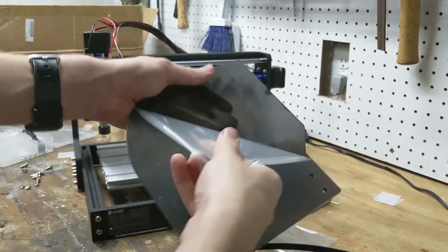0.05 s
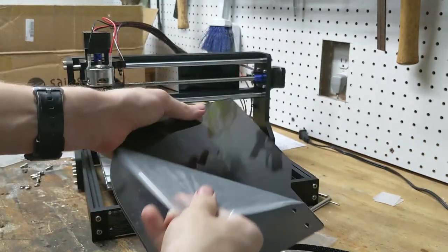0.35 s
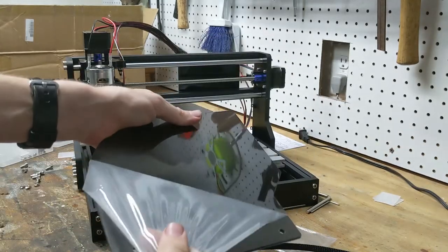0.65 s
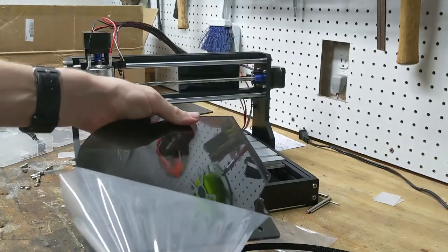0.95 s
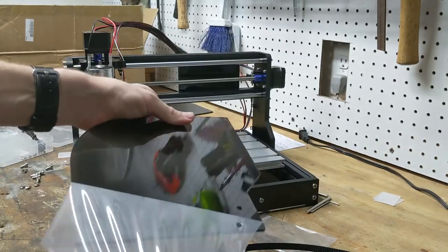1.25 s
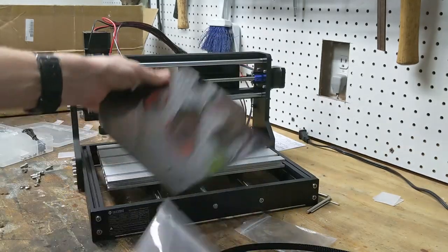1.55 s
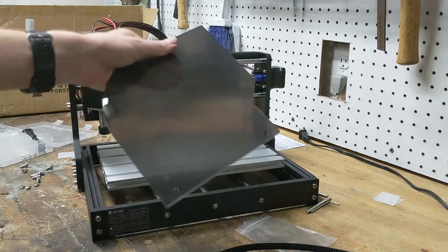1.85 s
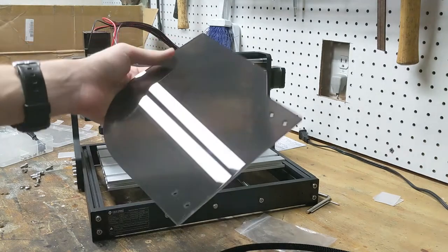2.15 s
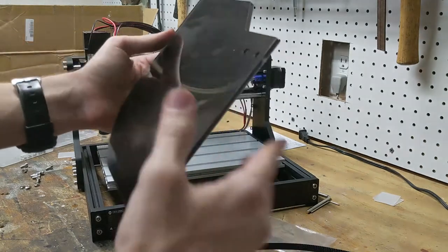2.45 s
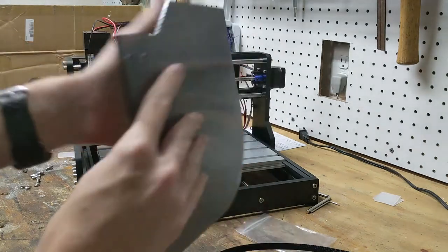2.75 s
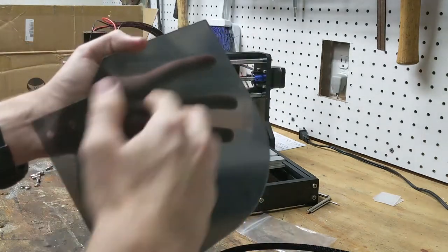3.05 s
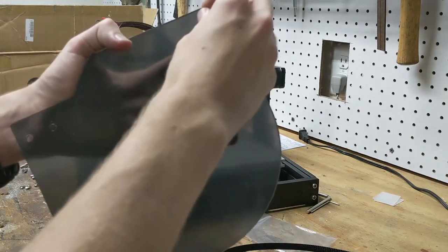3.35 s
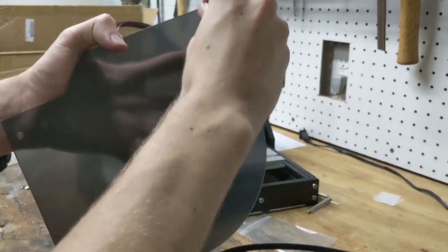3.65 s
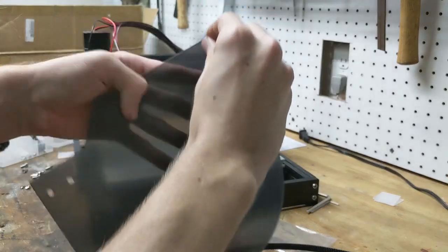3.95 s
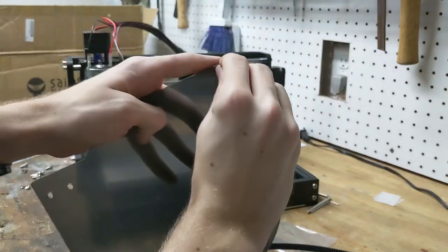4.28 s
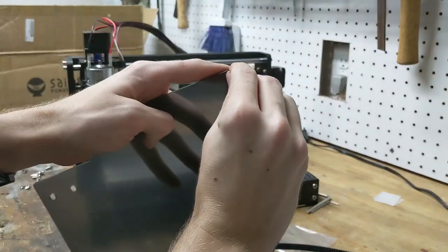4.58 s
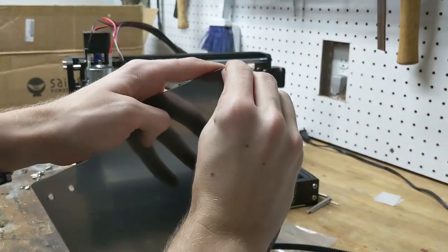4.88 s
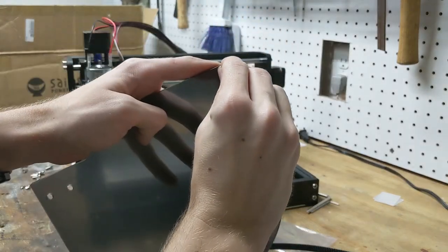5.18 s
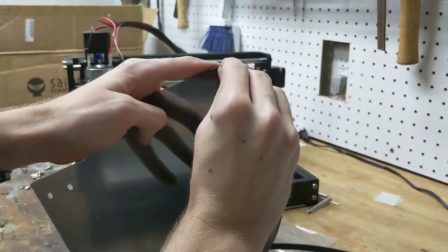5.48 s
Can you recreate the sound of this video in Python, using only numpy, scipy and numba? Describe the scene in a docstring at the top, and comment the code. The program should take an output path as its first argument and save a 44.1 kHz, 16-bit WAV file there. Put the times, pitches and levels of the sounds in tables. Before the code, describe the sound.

Sharp snaps and a fizzing crackle sound close to a stereo microphone as plastic film is pulled off a hand-held acrylic sheet. The film flutters, rips free and crinkles briefly. Quieter handling follows, with rubbing fingers, light ticks and faint squeaks, until the sheet lands with a low knock and a few smaller bumps. A faint workshop hum runs underneath, and the room echoes only slightly.

```python
"""A small workshop with a low hum, a stereo microphone close to a hand-held acrylic panel.
Protective film is pulled off in a few pulls: the glue lets go in countless tiny snaps that drum
on the taut film, and the loose film flutters, flaps and crinkles. Then the panel is turned over,
fingers slide and squeak on it, and it is set down with a knock. Bench and walls answer briefly."""
import sys
import numpy as np
from scipy import signal
from scipy.fft import rfft, irfft
from scipy.io import wavfile
from scipy.ndimage import uniform_filter1d
from numba import njit

SR = 44100
rng = np.random.default_rng(int(sys.argv[2]) if len(sys.argv) > 2 else 0)


def store_wav(level_fs):
    """Save 16-bit WAV to argv[1]."""
    pcm = np.round(np.clip(np.atleast_2d(level_fs), -1, 1) * 32767)
    wavfile.write(sys.argv[1], SR, pcm.T.astype(np.int16))


N = 247842
T = np.arange(N) / SR


def undb(db):
    """Decibels to gain."""
    return 10 ** (np.asarray(db) / 20)


def unit(x):
    """Scale to rms 1."""
    return x / np.sqrt(np.mean(x ** 2))


def colour(x, points):
    """Causal filter with a spectrum of (f/Hz, level/dB) points."""
    size = 4096
    hz, db = np.transpose(points)
    f = np.fft.rfftfreq(size, 1 / SR) + 1
    cepstrum = irfft(np.log(undb(np.interp(np.log(f), np.log(hz), db))))
    cepstrum[1:size // 2] *= 2  # folded for minimum phase
    cepstrum[size // 2 + 1:] = 0
    response = irfft(np.exp(rfft(cepstrum))).reshape((1,) * (x.ndim - 1) + (-1,))
    return signal.fftconvolve(x, response, axes=-1)[..., :x.shape[-1]]


def cut(x, hz, kind, order=2):
    """Low-, high- or band-pass."""
    sos = signal.butter(order, np.minimum(hz, SR / 2 - 1), kind, fs=SR, output="sos")
    return signal.sosfilt(sos, x)


def add(out, s, x):
    """Mix a sound in at time s."""
    i = max(int(s * SR), 0)
    out[..., i:i + x.shape[-1]] += x[..., :max(N - i, 0)]


@njit
def resonate(x, hz, damping):
    """Band-pass whose centre moves."""
    y, band, low = np.empty(len(x)), 0., 0.
    for i in range(len(x)):
        g = np.tan(np.pi * hz[i] / SR)
        v = (band + g * (x[i] - low)) / (1 + g * (g + damping))
        band, low = 2 * v - band, low + 2 * g * v
        y[i] = damping * v
    return y


def echo(x, lag):
    """A copy that comes a moving number of samples later."""
    samples = np.arange(len(x))
    return np.interp(samples - lag, samples, x)


def fade(t, t60):
    """Exponential decay."""
    return np.exp(-np.log(1000) * t / t60)


def walk(rate):
    """Smooth random drift with rms 1."""
    hold = int(SR / rate)
    steps = np.repeat(rng.standard_normal(N // hold + 1), hold)
    return unit(uniform_filter1d(uniform_filter1d(steps, hold), hold)[:N])


def grains(rate, spread_db):
    """Tiny slips at random moments; the spread makes a few much larger than the rest."""
    size = undb(spread_db * np.minimum(rng.exponential(size=N), 4))
    return unit((rng.random(N) < rate / SR) * size * rng.choice([-1, 1], N))


def burst(t60):
    """A dying spray of noise, unlike at the microphone's two ports."""
    t = T[:SR // 5]
    return rng.standard_normal((2, len(t))) * fade(t, t60)


def ring(modes):
    """Response of a set of modes to one blow, peak 1."""
    t = T[:SR // 2]
    y = sum(undb(db) * np.sin(2 * np.pi * hz * t) * fade(t, t60) for hz, db, t60 in modes)
    y *= 1 - fade(t, t60=0.0084)  # the bend takes a moment to spread over the sheet
    return y / np.abs(y).max()


# reverberation of the workshop walls: f/Hz, t60/s
WALL_DECAY = [(100, 0.37), (500, 0.27), (2000, 0.4), (6000, 0.29), (15000, 0.2)]
def room(x, near_db, far_db, near_t60):
    """Direct sound, quick echoes from bench and pegboard, then the tail from farther off."""
    t = T[:SR // 2]
    hz, t60 = np.transpose(WALL_DECAY)
    edges = np.geomspace(60, 20000, 9)
    mid, side = rng.standard_normal((2, len(t)))
    side = cut(side, 700, "high", order=1)  # the bass is alike at both ports
    noise = np.array([mid + side, mid - side]) / np.sqrt(2)
    tail = sum(cut(noise, [low, high], "band") * fade(t, np.interp(np.sqrt(low * high), hz, t60))
               for low, high in zip(edges, edges[1:]))
    near = undb(near_db) * unit(noise[:, ::-1] * fade(t, near_t60) * (t > .002))
    far = undb(far_db) * unit(tail * (t > .008))
    response = (near + far) / np.sqrt(len(t))
    return x + signal.fftconvolve(np.atleast_2d(x), response, axes=-1)[:, :N]


# room tone all around the microphone: f/Hz, relative level/dB
ROOM_TONE = [(20, -3.5), (62, 1), (86, -20.5), (120, -8), (170, -22.5), (250, -16.5), (450, -19),
             (760, -22), (1400, -32.5), (2400, -32.5), (3500, -30.5), (9000, -35.5), (16000, -39.5)]
# low hum of the workshop: f/Hz, level/dB
HUM_TONES = [(118.4, -77), (236.9, -76), (301.5, -80), (376.8, -89.5)]
def workshop(air_db=-62):
    """Steady rumble and hiss with a wavering hum."""
    mid, side = rng.standard_normal((2, N))
    side = 0.13 * side + cut(side, 553, "high", order=1)
    air = unit(colour(np.array([mid + side, mid - side]), ROOM_TONE))
    hum = np.zeros(N)
    for hz, db in HUM_TONES:
        peak = np.sqrt(2) * undb(db + 1.3 * walk(rate=5.1))
        hum += peak * np.sin(2 * np.pi * hz * T + 0.32 * walk(rate=5))
    return air * undb(air_db + 0.77 * walk(rate=4.27)) + hum


# fingers and loose film sliding on the panel: t/s, length/s, level/dB
SLIDES = [(0.0, 0.022, -56.5), (0.29, 0.13, -70), (1.74, 0.26, -55.5), (1.945, 0.21, -54),
          (2.132, 0.2, -56.5), (2.3, 0.35, -70.5), (2.56, 0.33, -64.5), (2.828, 0.32, -68),
          (3.087, 0.14, -63.5), (3.438, 0.028, -49), (3.2, 1.2, -75.5), (3.812, 0.22, -64.5),
          (4.069, 0.051, -65), (4.187, 0.088, -60), (4.32, 0.13, -67)]
# spectrum of the sliding: f/Hz, relative level/dB
SLIDE_SPECTRUM = [(300, 3), (1000, -2), (2000, -8), (3500, -0.5), (8000, -0.5), (12000, -2.5),
                  (16000, -0.5)]
def rubs():
    """Skin and loose film stick and slip over the panel in short swells."""
    swell = np.zeros(N)
    for s, length, db in SLIDES:
        add(swell, s, undb(db) * np.sqrt(np.hanning(int(length * SR))))
    slips = np.array([grains(rate=2500, spread_db=0) for _ in range(2)])
    friction = unit(colour(slips, SLIDE_SPECTRUM))
    return room(friction * swell, near_db=-4.5, far_db=-5.5, near_t60=0.037)


# pulls on the film, close by: start t/s, end t/s, swell of the fizz/(dB/s), fizz level/dB,
# drum level/dB, flutter level/dB, drum start f/Hz, end f/Hz, flutter start f/Hz, end f/Hz
FILM_PULLS = [(0.021, 0.166, 46.5, -53.5, -54.5, -68.5, 2000, 2240, 324, 440),
              (0.167, 0.306, -49, -56, -59.5, -63.5, 750, 800, 490, 586),
              (0.38, 0.674, -15.5, -49, -65.5, -62, 830, 740, 382, 112),
              (0.782, 0.991, -25, -52.5, -64.5, -65.5, 720, 630, 447, 325),
              (1.129, 1.457, -8.5, -53.5, -60, -62, 780, 770, 455, 220),
              (1.439, 1.554, 120, -53.5, -50, -61, 865, 1020, 210, 240),
              (1.547, 1.671, 5, -40.5, -40, -59, 1380, 2000, 270, 250)]
# spectrum of the parting glue: f/Hz, relative level/dB
GLUE_SPECTRUM = [(250, -33), (700, -18), (1500, -17), (2800, -4.5), (4400, -1.5), (5700, -1), (7600, -2.5),
                 (11000, -5.5), (16000, -4.5)]
def peel():
    """The glue line lets go in a dense fizz, and the same tugs drum on the film."""
    _, _, _, fizz_db, drum_db, _, start_hz, end_hz, _, _ = np.transpose(FILM_PULLS)
    grip = undb(1.04 * walk(rate=97))  # the glue holds unevenly
    # the line is long, so each port hears its own share of the snaps
    snaps = np.array([grains(rate=7000, spread_db=4.5) for _ in range(2)])
    # the panel mirrors them over a path that changes as the hands move
    mirrored = np.array([echo(port, SR * 0.000697 * undb(2 * walk(rate=14))) for port in snaps])
    fizz = unit(colour(snaps + .5 * mirrored, GLUE_SPECTRUM))
    fizz *= pull_gain(fizz_db, speed_share=1, release_t60=0.24)  # glue creeps on after the hand stops
    hz = pull_glide(start_hz, end_hz)
    drum = resonate(grains(rate=1400, spread_db=2.5), hz, damping=0.68) / np.sqrt(hz)
    drum = unit(cut(drum, 3800, "low")) * pull_gain(drum_db, speed_share=0.39)
    return room((fizz + drum) * grip, near_db=0.5, far_db=-14.5, near_t60=0.035)


# patches of glue giving way at once: t/s, half width/s, lift of the fizz/dB
GLUE_SURGES = [(0.098, 0.0077, 21.5), (0.135, 0.0078, 14), (0.157, 0.008, 11), (0.466, 0.038, 10.5),
               (0.812, 0.027, 3), (1.277, 0.035, 8.5), (1.535, 0.02, 5.5), (1.666, 0.016, 5.5)]
def pull_gain(levels_db, speed_share, release_t60=0.12, attack_s=0.026):
    """Each pull takes hold and dies away; a layer follows its share of the swell and the surges."""
    surge_db = sum(db * np.exp(-((T - s) / width) ** 2) for s, width, db in GLUE_SURGES)
    power = 0
    for (start, end, swell, *_), db in zip(FILM_PULLS, levels_db):
        attack = np.clip((T - start) / attack_s, 0, 1)
        release = fade(np.maximum(T - end, 0), release_t60)
        speed_db = swell * np.clip(T - start, 0, end - start) + surge_db
        power += (attack * release * undb(db + speed_share * speed_db)) ** 2
    return np.sqrt(power)


def pull_glide(start_hz, end_hz):
    """A resonance slides evenly in pitch through each pull as the span of film changes."""
    times = np.maximum.accumulate(np.array(FILM_PULLS)[:, :2].ravel())
    hz = np.column_stack([start_hz, end_hz]).ravel()
    return np.exp(np.interp(T, times, np.log(hz)))


def flutter():
    """The freed span of film shivers at its lowest resonance while it is pulled."""
    *_, flutter_db, _, _, start_hz, end_hz = np.transpose(FILM_PULLS)
    hz = pull_glide(start_hz, end_hz)
    span = resonate(rng.standard_normal(N), hz, damping=0.3)
    span = resonate(span, hz, damping=0.86) / np.sqrt(hz)
    heave = cut(rng.standard_normal(N), [90, 240], "band")  # the pull also shakes the whole panel
    shiver = (unit(span) + undb(-5) * unit(heave)) * pull_gain(flutter_db, speed_share=0.12)
    return room(shiver, near_db=-6.5, far_db=-8.5, near_t60=0.022)


def pop(hz):
    """A patch of film snaps through in a cycle or two; being small, it radiates little bass."""
    cycles = T[:SR // 20] * hz
    snap = np.sin(2 * np.pi * cycles) * (1 - np.exp(-2 * cycles)) * fade(cycles, t60=5.5)
    return cut(snap, hz / 2, "high")


# the larger creases: t/s, pop level/dB, pop f/Hz, crack level/dB, rattle level/dB
BUCKLES = [(0.029, -40, 2250, -29, -44.5), (0.055, -22, 1910, -42, -56), (0.066, -23, 2120, -13, -35),
           (0.080, -20, 2280, -18.5, -55), (0.0922, -9, 2270, -19, -35), (0.118, -17, 2230, -28, -29.5),
           (0.641, -35, 1060, -44, -53), (0.764, -60, 1020, -41.5, -54.5), (1.286, -29.5, 810, -38, -51),
           (1.455, -20, 950, -15.5, -34), (1.5652, -22, 1390, -12, -38), (1.666, -32, 2760, -17.5, -40),
           (1.738, -31, 1700, -38, -38), (1.811, -18, 1420, -30, -55), (1.824, -25, 1020, -23, -33),
           (1.876, -32, 1410, -34, -64), (1.891, -29, 1200, -32, -38), (1.921, -30, 1030, -48, -48),
           (1.944, -34, 1490, -34, -44.5), (2.008, -26, 1040, -34, -35.5), (2.055, -26, 2750, -16, -29.5),
           (2.109, -29.5, 1120, -50, -59), (2.194, -25.5, 1560, -33, -42.5), (2.231, -19, 1300, -19.5, -30),
           (2.310, -39, 1260, -31.5, -46.5)]
# colour of the film's cracks and the panel's ticks: f/Hz, relative level/dB
CRACK_SPECTRUM = [(300, -3.5), (600, -1), (1300, -5.5), (2600, -3.5), (5500, -1), (9000, -6), (12000, -3),
                  (16000, -12)]
def creases(relax_s=(1.78, 2.3), small_per_s=26, small_db=-40, small_hz=1300):
    """A crease buckles: a pop, a bright crack, and a rattle that dies away in the film."""
    pops, cracks = np.zeros(N), np.zeros((2, N))
    for s, pop_db, hz, crack_db, rattle_db in BUCKLES:
        crack = undb(crack_db) * burst(t60=0.0037) + undb(rattle_db) * burst(t60=0.13)
        add(pops, s + 0.00061, undb(pop_db) * pop(hz))
        add(cracks, s + .0008, cut(crack, hz * .4, "high"))
    # small creases only pop, at random, while the loose film relaxes
    first, last = relax_s
    for when, size, pitch in rng.random((int(small_per_s * (last - first)), 3)):
        small_pop = undb(small_db) * (.5 + size) * pop(small_hz * 2 ** (pitch - .5))
        add(pops, first + when * (last - first), small_pop)
    return room(pops + colour(cracks, CRACK_SPECTRUM), near_db=-6.5, far_db=-9, near_t60=0.048)


# lift of the film's highest treble: t/s, relative level/dB
TREBLE_LIFT = [(0.5, 2.5), (0.85, 8.5), (1.46, 5), (1.55, -2), (1.85, -7), (2.25, -8)]
def film_sheen(sound):
    """The film's highest treble is brighter in the gentle pulls, duller in the final rip and crinkling."""
    treble = sound - uniform_filter1d(sound, size=3, axis=-1)
    lift = undb(np.interp(T, *np.transpose(TREBLE_LIFT)))
    return sound + treble * (lift - 1)


# flaps of the slack film: t/s, level/dB
FILM_FLAPS = [(0.1484, -22.5), (0.151, -21.5), (0.158, -30), (0.243, -42.5), (0.277, -39.5), (0.381, -41.5)]
# modes of the film: f/Hz, relative level/dB, t60/s
FILM_MODES = [(137, -15, .08), (315, -17, 0.135), (398, -5.5, 0.086), (506, 11, 0.033), (816, 4, 0.037),
              (903, 6.5, 0.034), (1015, 2.5, 0.04), (1323, 4, 0.028), (1750, -28, .03)]
def flaps():
    """The freed film goes slack and is jerked tight again like a loose drumhead."""
    out = np.zeros(N)
    for s, db in FILM_FLAPS:
        add(out, s, undb(db) * ring(FILM_MODES))
    return room(out, near_db=-5, far_db=-9.5, near_t60=0.041)


# blows on the panel: t/s, level/dB, low-pass f/Hz, tick level/dB, share of ring time the grip leaves
PANEL_BLOWS = [(0.65, -39.5, 89, -67, 0.58), (2.667, -41, 160, -49, 0.57), (2.956, -50.5, 302, -66, 0.66),
               (3.057, -48, 200, -59, 0.32), (3.335, -38.5, 1110, -45, 0.37),
               (3.439, -66, 1500, -48.5, 0.35), (4.278, -19, 680, -51.5, 0.98),
               (4.323, -31, 300, -40, 0.82), (4.359, -38, 400, -64, 0.93), (4.416, -46, 895, -53.5, 0.77),
               (5.316, -49, 2500, -55, 1)]
# modes of the free panel: f/Hz, relative level/dB, t60/s
PANEL_MODES = [(116.4, -8.5, 0.31), (155, -3, 0.1), (227, -11.5, 0.27), (260.7, 3.5, 0.13),
               (299, -7.5, 0.13), (382, -1, 0.068), (444, -13, 0.16), (552, -10, 0.1), (630, -30, 0.067),
               (853, -9, 0.078), (1040, -8, 0.028), (1310, -10.5, 0.028), (1460, -19, 0.027),
               (2580, -16, 0.043)]
def knocks(buzz_db=-33.5):
    """The held panel rings low and briefly; soft contacts dull its high modes, hard edges add a tick."""
    out, ticks = np.zeros(N), np.zeros((2, N))
    for s, db, edge_hz, tick_db, free in PANEL_BLOWS:
        body = ring([(hz, mode_db, t60 * free) for hz, mode_db, t60 in PANEL_MODES])
        buzz = cut(burst(t60=0.12 * free)[0], [300, 1500], "band")  # the edge chatters on what it meets
        for part in (body, undb(buzz_db) * unit(buzz)):
            add(out, s, undb(db) * cut(part, edge_hz, "low", order=1))
        tick = burst(t60=0.0068) + undb(-1) * burst(t60=0.13)
        add(ticks, s, undb(tick_db) * tick)
    return room(out + colour(ticks, CRACK_SPECTRUM), near_db=-18, far_db=-7, near_t60=0.016)


# fingertips on the bare acrylic: t/s, length/s, start f/Hz, end f/Hz, level/dB
FINGER_SQUEAKS = [(3.434, 0.015, 3950, 3800, -52.5), (3.828, 0.04, 700, 1700, -74.5),
                  (3.911, 0.055, 890, 2220, -68.5), (3.974, 0.046, 300, 315, -66)]
def squeaks():
    """A fingertip catches and slips almost regularly for a moment."""
    out = np.zeros(N)
    for s, length, start_hz, end_hz, db in FINGER_SQUEAKS:
        n = int(length * SR)
        hz = np.geomspace(start_hz, end_hz, n)
        squeal = unit(resonate(rng.standard_normal(n), hz, damping=0.28))
        add(out, s, undb(db) * squeal * np.sqrt(np.hanning(n)))
    return room(out, near_db=1, far_db=-10, near_t60=0.14)


def scene():
    """Workshop, film and panel as they reach the microphone."""
    film = film_sheen(peel() + creases()) + flutter() + flaps()
    panel = knocks() + rubs() + squeaks()
    return workshop() + film + panel


# resonances of the microphone's ports: f/Hz, relative level/dB
PORT_RESPONSE = [(1150, -0.5), (1600, -0.5), (2050, -2.5), (2550, 1), (3400, 1), (4700, 0), (5700, 4),
                 (6700, -4), (7600, 2), (8500, -4), (9500, 2), (10700, -4.5), (11600, -0.5), (12800, -4),
                 (15500, -2.5)]
def record(dry):
    """The microphone's ports ripple the treble; the left one is a little duller at the very top."""
    ported = colour(dry, PORT_RESPONSE)
    left = colour(ported[0], [(100, 0.1), (400, 2.5), (5000, -1.0), (9000, 2.0), (15000, -5.5)])
    right = colour(ported[1], [(100, 0.36), (400, -0.24), (5000, -0.68), (9000, 1.26), (15000, -0.073)])
    top_cut = signal.ellip(10, .2, 70, 15900, fs=SR, output="sos")  # steep low-pass at 15.9 kHz
    return signal.sosfilt(top_cut, np.array([left, right]))


dry = scene()
out = record(dry)
store_wav(out)
```